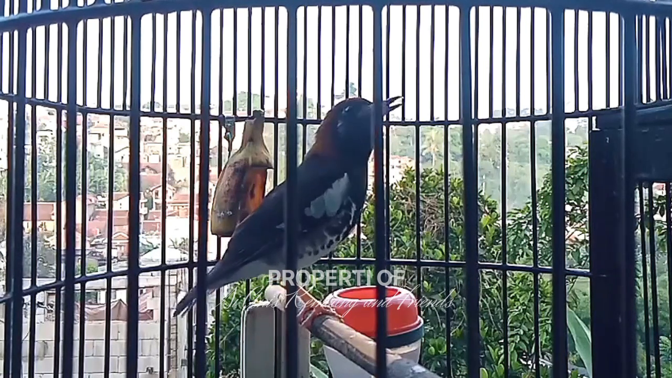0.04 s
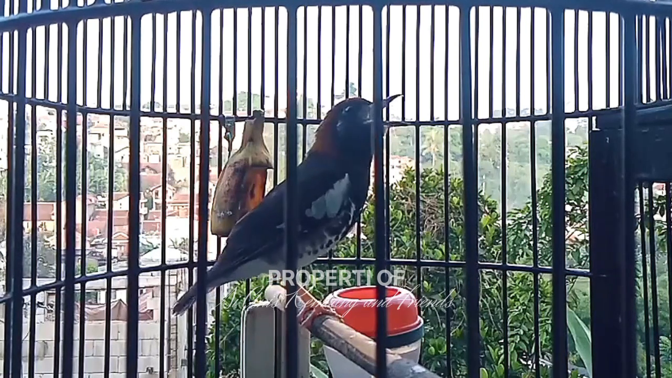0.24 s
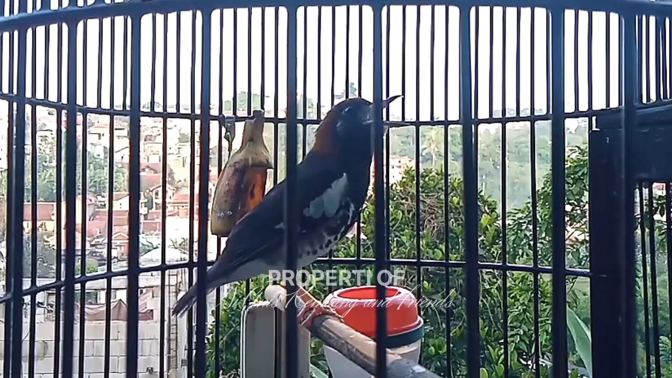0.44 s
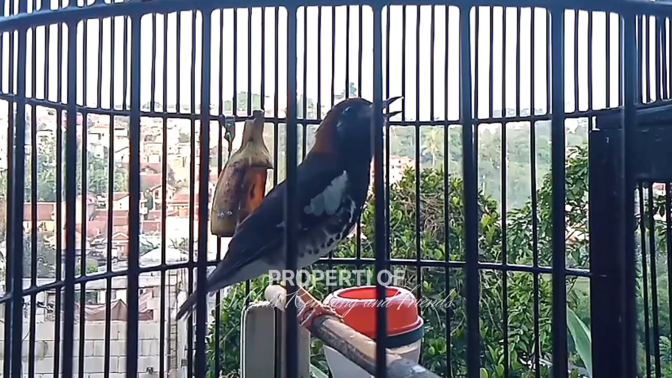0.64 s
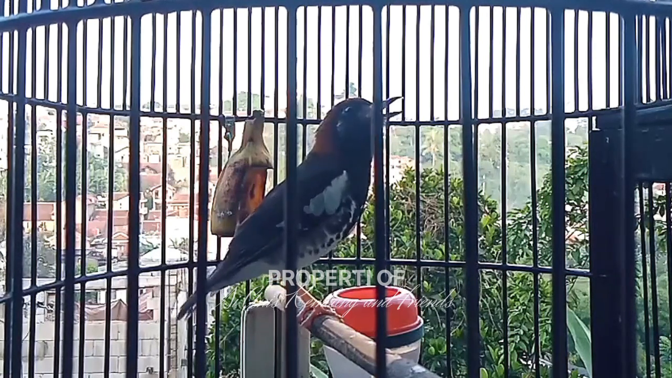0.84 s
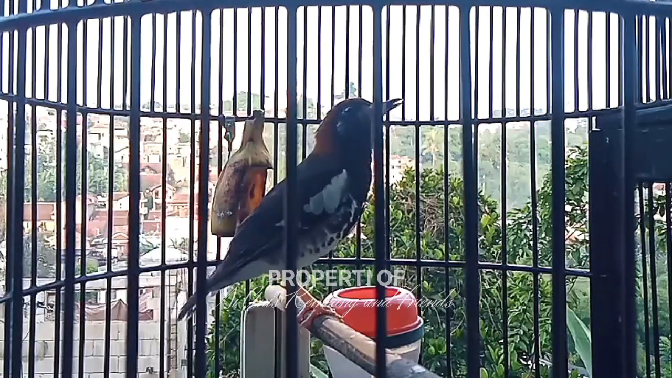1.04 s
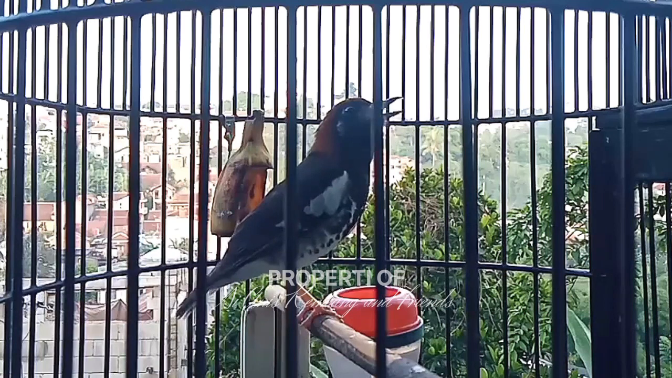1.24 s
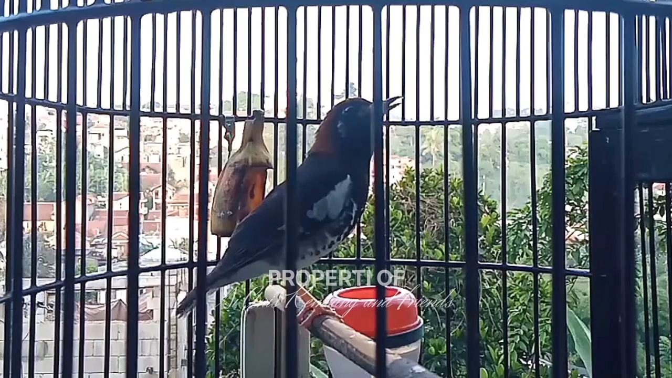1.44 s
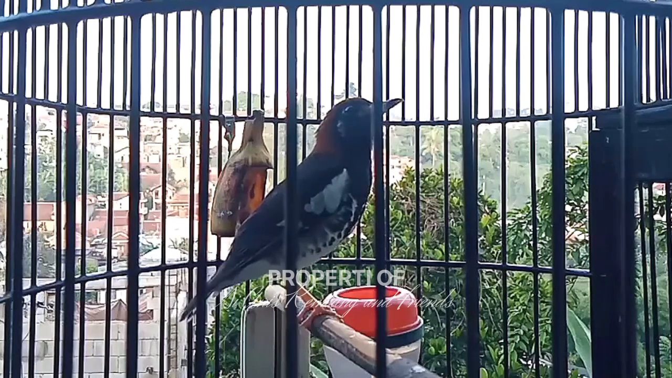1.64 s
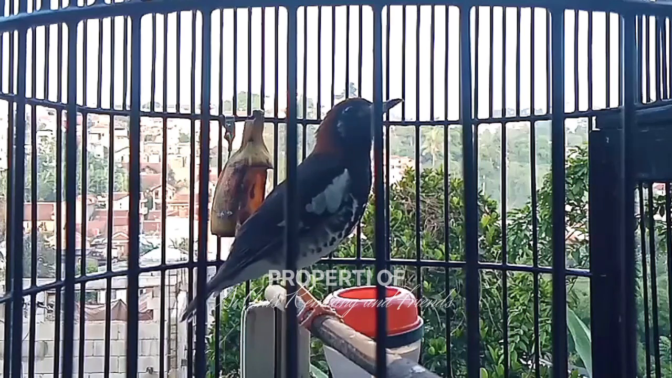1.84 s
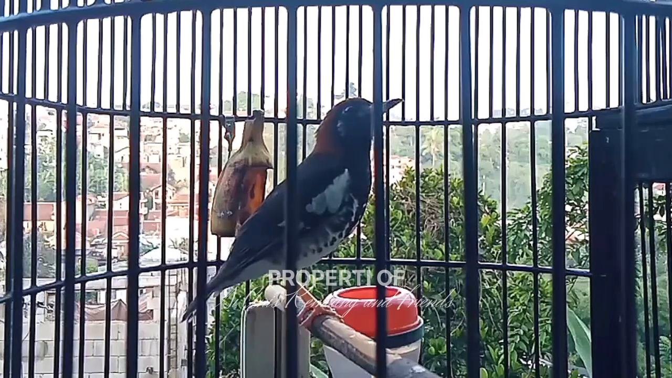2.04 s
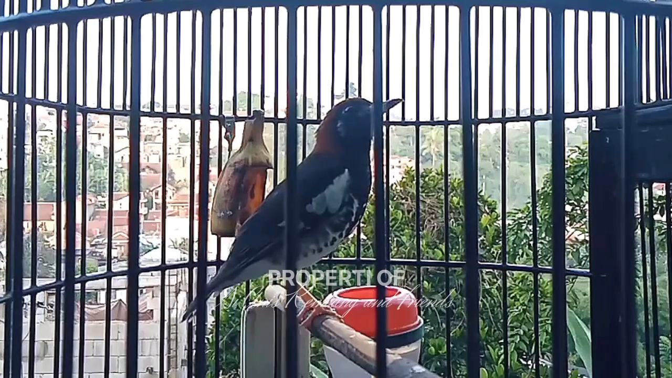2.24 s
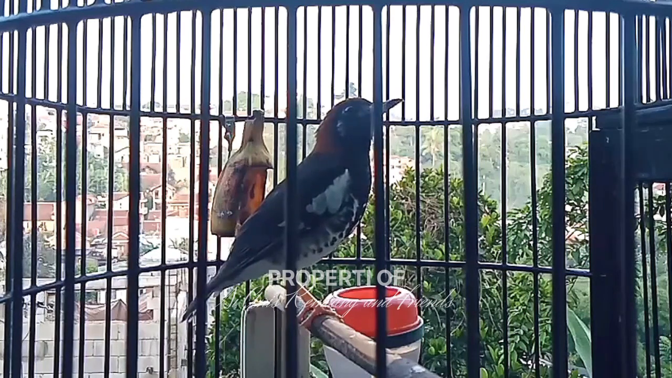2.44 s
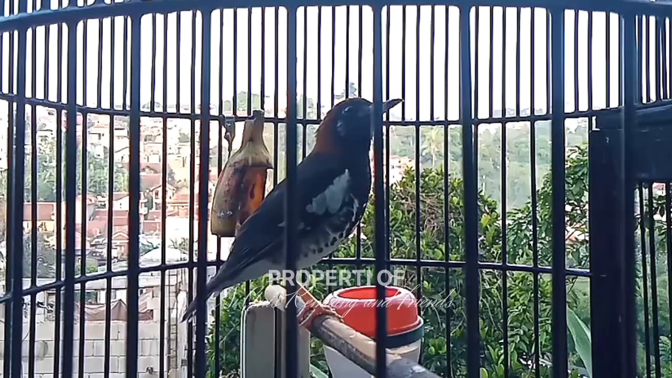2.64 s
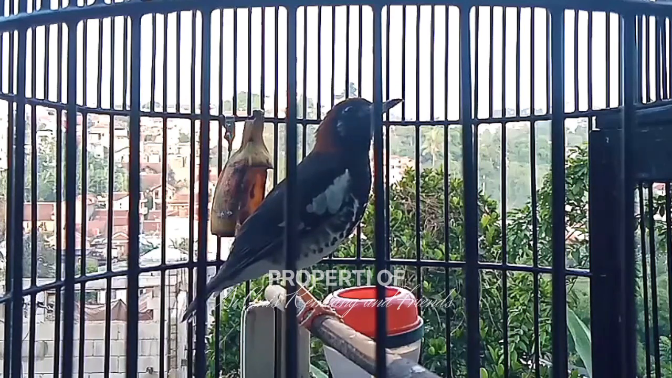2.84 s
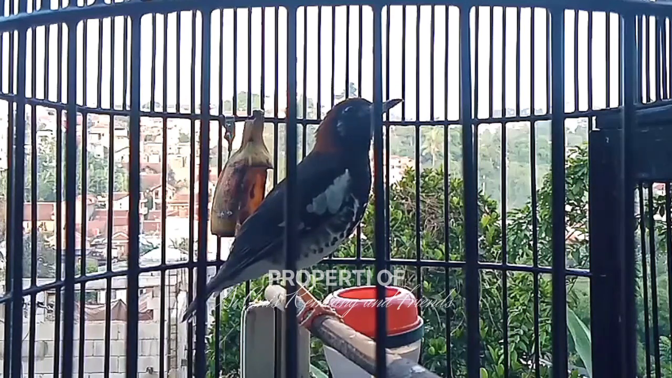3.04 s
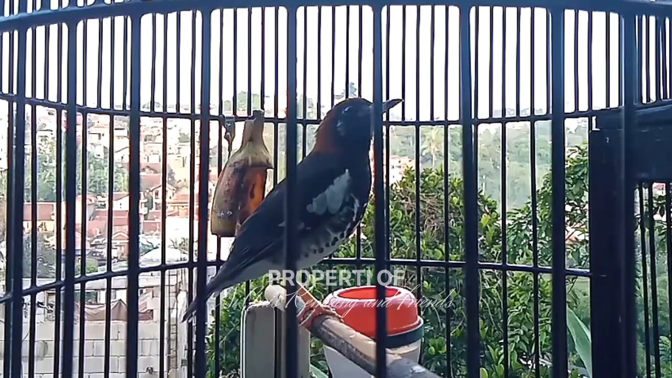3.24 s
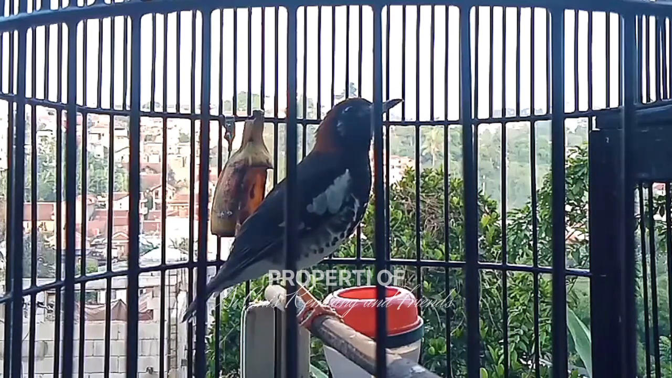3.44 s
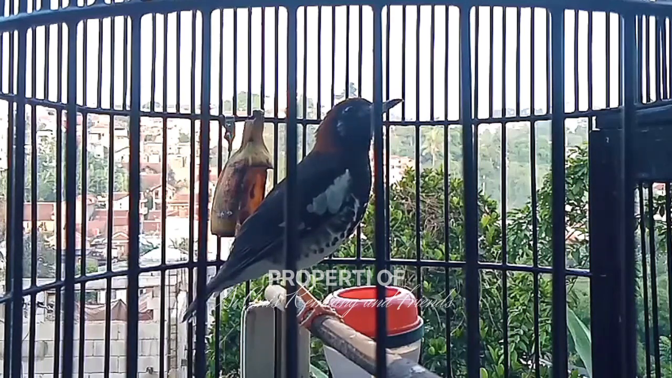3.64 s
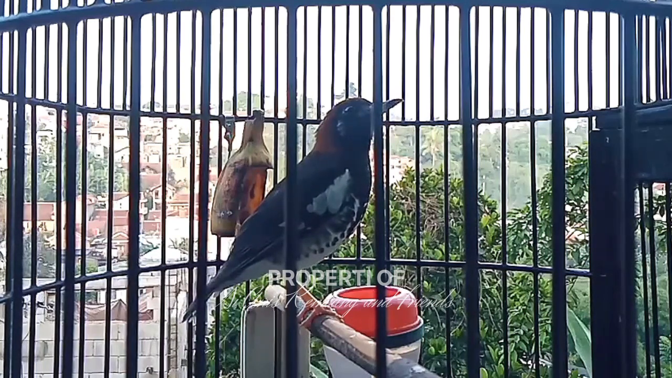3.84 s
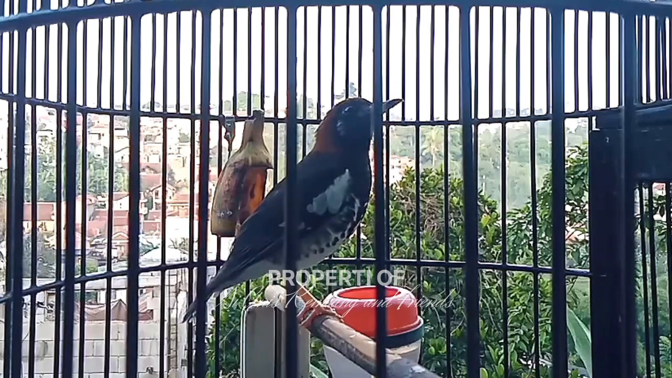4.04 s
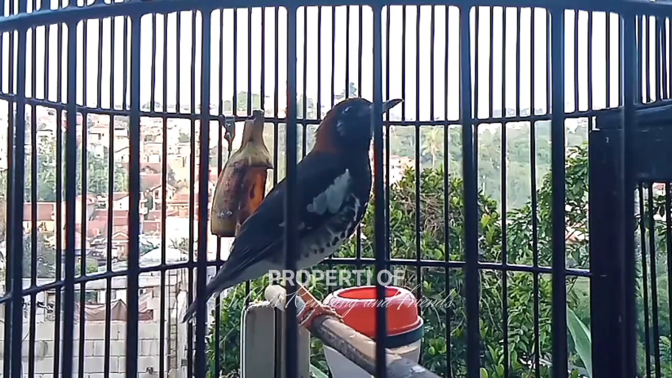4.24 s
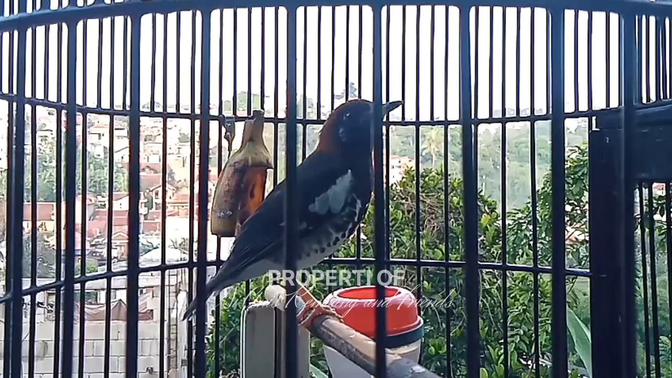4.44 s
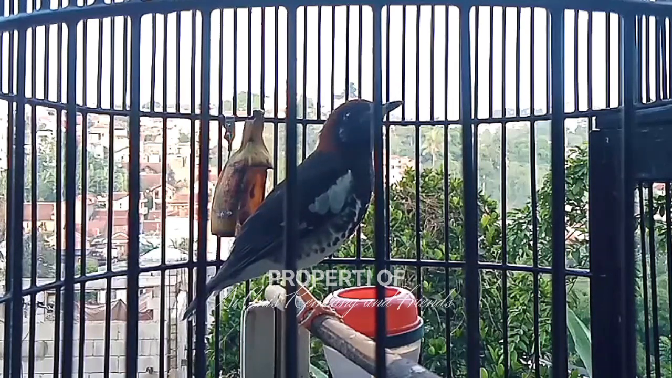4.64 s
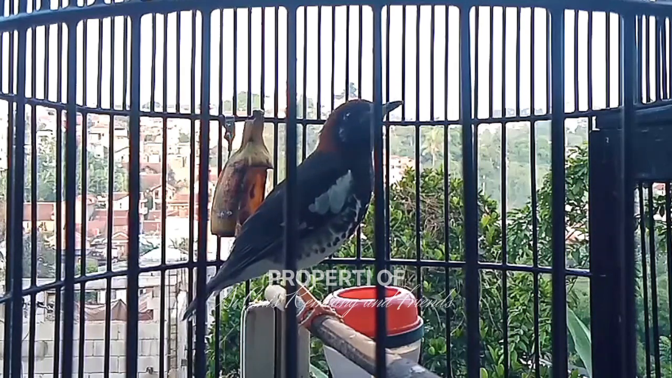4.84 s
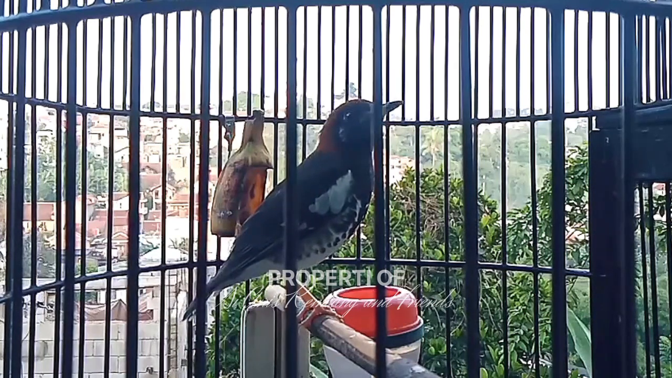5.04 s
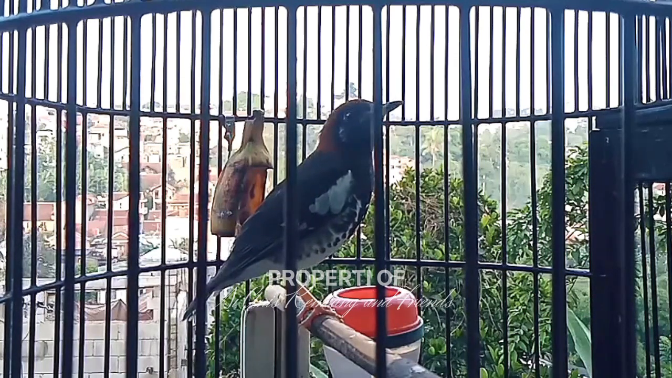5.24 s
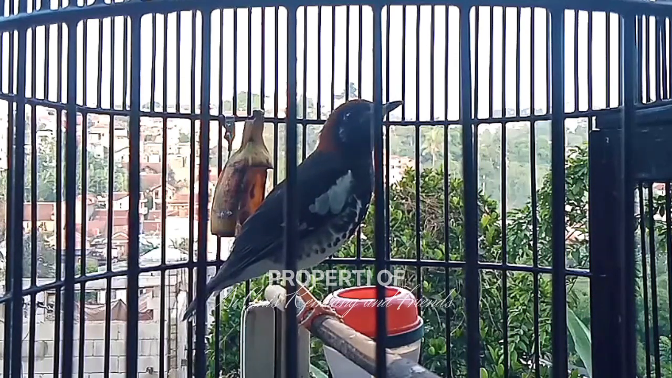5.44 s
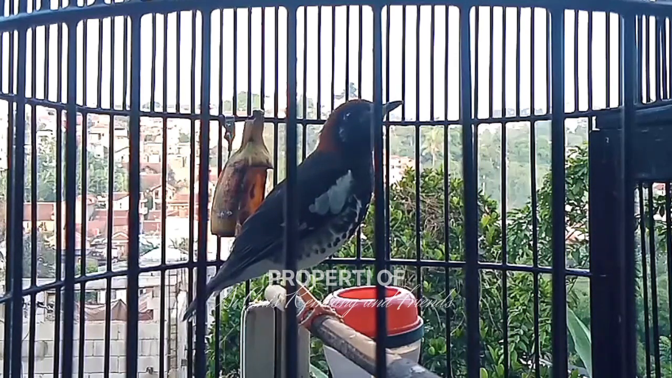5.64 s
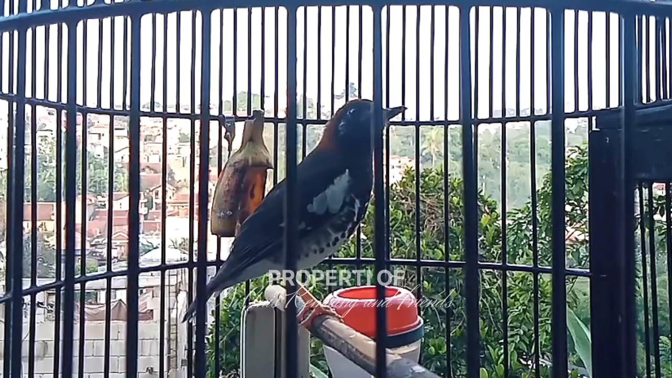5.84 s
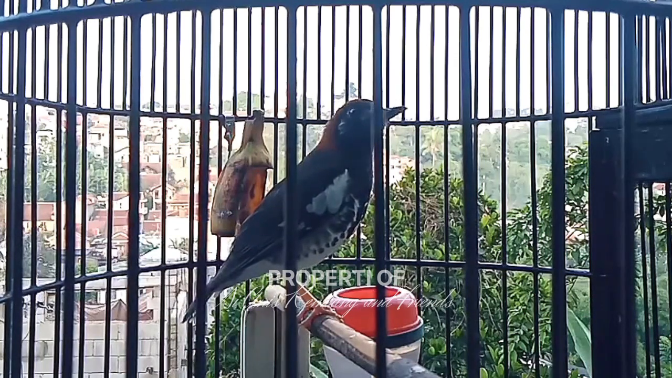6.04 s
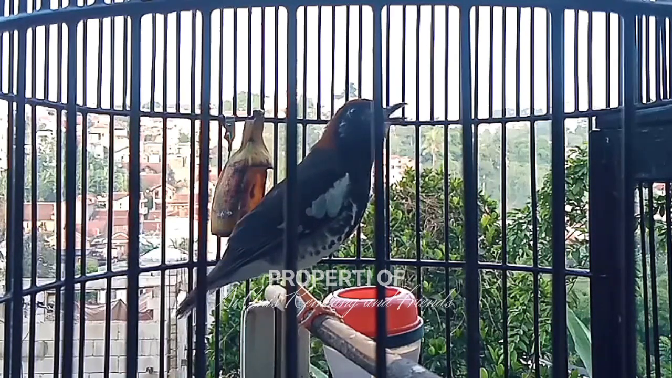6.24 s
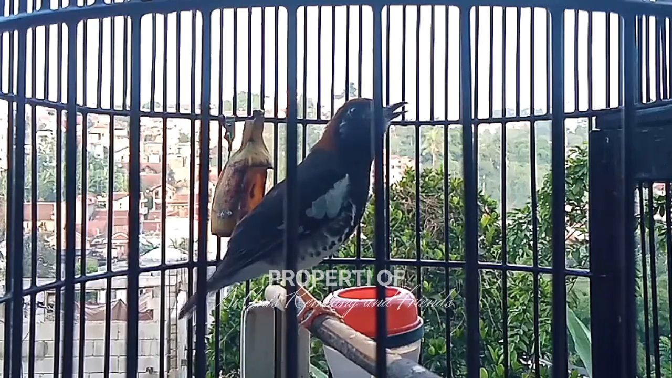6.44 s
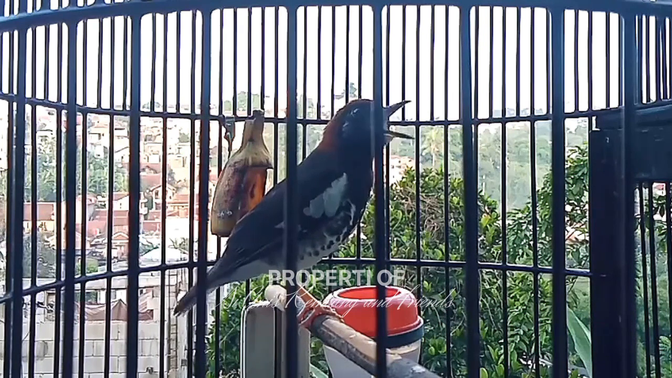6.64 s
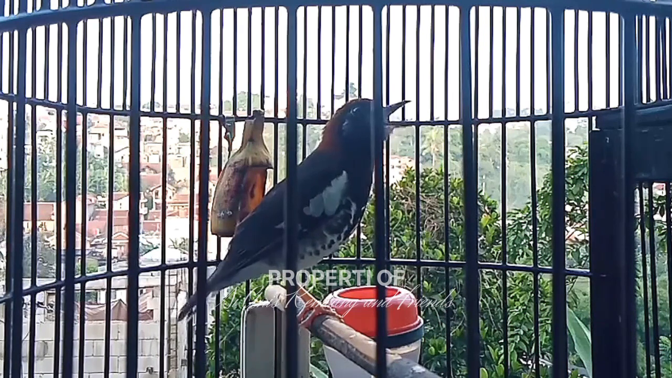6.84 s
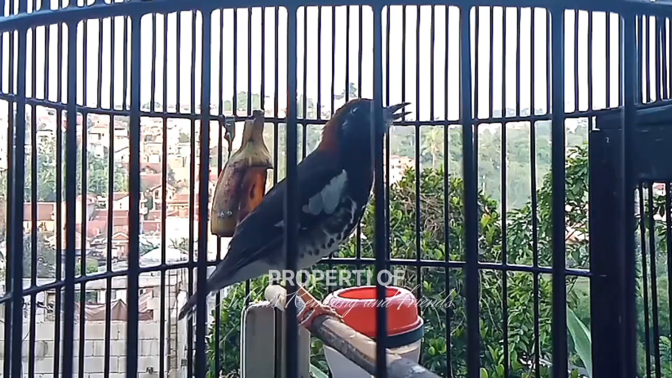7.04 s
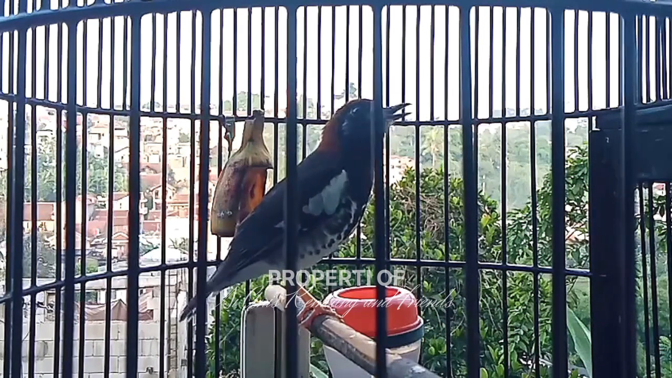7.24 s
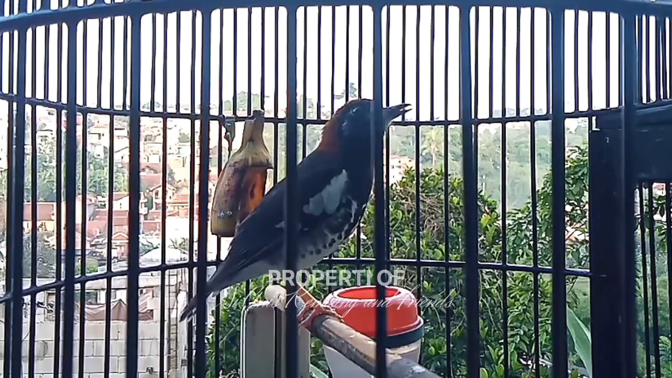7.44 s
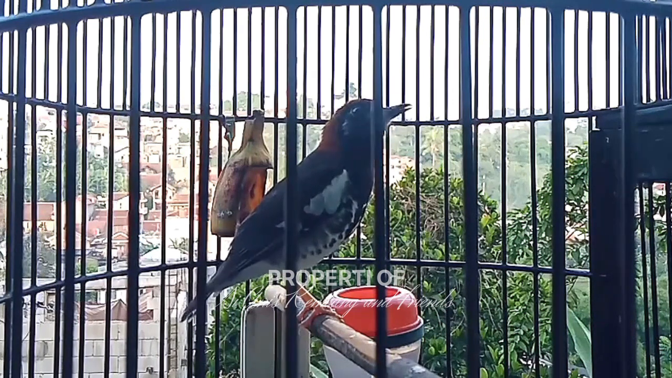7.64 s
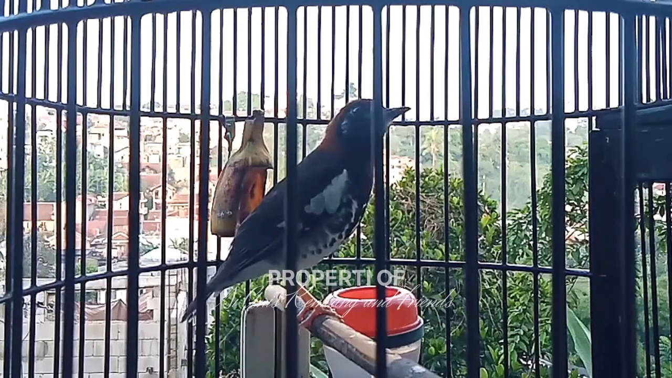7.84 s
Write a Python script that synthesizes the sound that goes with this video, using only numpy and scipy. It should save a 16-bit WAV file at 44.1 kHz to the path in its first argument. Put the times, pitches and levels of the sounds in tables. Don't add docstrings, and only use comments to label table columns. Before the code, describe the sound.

Very close, a caged thrush sings a falling whistle, a high two-toned note, three short held notes and a plunging, then falling whistle. After about 1.7 seconds it stops. Distant roosters crow over low traffic, with faint small chirps. Near 6.3 seconds the bird returns with a falling whistle and six quick upward double chirps. Close microphone on an open porch, short wall reflections.

```python
import sys
import numpy as np
from scipy import signal
from scipy.io import wavfile
from scipy.ndimage import uniform_filter1d, minimum_filter1d

SR = 44100
rng = np.random.default_rng(int(sys.argv[2]) if len(sys.argv) > 2 else 0)


def output_pcm(signal):
    pcm = np.clip(np.atleast_2d(signal).T, -1, 1) * 32767
    wavfile.write(sys.argv[1], SR, np.round(pcm).astype(np.int16))


def voltage_ratio(level):
    return 10 ** (np.asarray(level, float) / 20)


N = 348371

# (time [s], level [dB])
TRAFFIC_LEVEL = [(0, -56.5), (.4, -57.5), (.85, -62), (1.25, -60), (1.6, -65), (1.849, -60), (3.3, -62),
                 (3.85, -63.5), (4.3, -62), (4.7, -58.5), (5.001, -52.5), (6.15, -52.5), (6.452, -60),
                 (6.93, -62.5), (7.399, -57), (7.9, -51)]
# (frequency [Hz], level per Hz [dB])
RUMBLE_COLOUR = [(15, -60.5), (25, -31), (38, -27.5), (86, -5.5), (145, 2.5), (270, -6.5), (330, -11.5),
                 (600, -24), (780, -46), (1320, -120)]
ROAR_COLOUR = [(180, -35), (300, -8.5), (548, -6), (639, -8), (763, -8), (1140, -14), (1500, -11.5),
               (2610, -16.5), (2970, -12.5), (5060, -33), (6580, -63.5), (11100, -120)]
HISS_COLOUR = [(4500, -13), (6000, -3.5), (11000, 0.5), (13000, -8.5), (15800, -12.5)]

# (time [s], pitch [Hz], level [dB], roughness [0-1])
LONG_CROWS = [
    [(0, 754, -40.5, 0.06), (.15, 754, -47.5, .1), (.3, 747.4, -52, .2), (.55, 750.5, -47.5, .2),
     (.72, 740, -62.5, .3), (.86, 724.6, -56.5, 0.23), (1.15, 675, -62, .3)],
    [(2.42, 867, -60, .15), (2.54, 905, -63, .15), (2.63, 922, -77, 0.19), (2.8, 907, -54.5, 0.16),
     (3.25, 883, -57, 0.36), (3.4, 823, -49.5, 0.07), (3.7, 817.7, -51.5, .1), (3.92, 805.6, -57, 0.21),
     (4.2, 733, -54.5, 0.47)],
]
# (start [s], length [s], pitch [Hz], peak level [dB], roughness [0-1])
CROW_SYLLABLES = [
    (3.93, .18, 560, -57, .6),
    (4.28, .19, 746, -46, .08),
    (4.55, .36, 708, -51, .2),
    (4.53, .3, 572, -57, .15),
    (5.16, .26, 530, -46, .06),
    (5.95, 1.2, 688, -55, .2),
    (6.17, .3, 565, -51, .2),
    (4.25, .07, 570, -57, .2),
    (4.85, .38, 682, -58, .1),
]
# (share of length [0-1], pitch change [share], level [dB])
SYLLABLE_OUTLINE = [(0, -.02, -11), (.15, 0, -2), (.7, -.003, 0), (1, -.025, -12)]
# (harmonics 1, 2, 3, 4, 5 [dB])
CROW_HARMONICS = [(-4.5, 3.5, -26, -31.5, -32.5), (-8.5, 0, -28, -35.5, -33), (4.5, 1, -2, -5, -11),
                  (5.5, -1, -5, -13, -32), (6, 6, -8, -6, -37.5), (7.5, -1, -9.5, -13, -27),
                  (7, -7, -10, -20, -29.5), (-14.5, -5, -22.5, -23, -26), (3.5, -20.5, -22.5, -11, -25.5),
                  (8.5, 6, 4.5, -8, -4), (1, 3.5, -14, -12, -30)]
# (start [s], length [s], pitch [Hz], level [dB])
SMALL_BIRD_CHIRPS = [(2.051, 0.13, 2980, -62.5), (2.28, .16, 3140, -56), (3.43, 0.055, 3600, -65),
                     (2.866, 0.041, 3000, -57), (3.073, 0.075, 2826, -61), (3.571, 0.045, 3690, -62.5),
                     (4.247, 0.076, 4160, -60.5), (5.07, 0.15, 3146, -51.5), (5.378, 0.062, 3455, -53),
                     (2.15, .1, 2964, -62), (2.463, .1, 3346, -68), (3.26, .06, 2950, -67),
                     (5.66, 0.088, 3030, -60.5), (5.86, 0.056, 2940, -60)]
# (delay [s], level [dB])
WALL_ECHOES = [
    (.0072, -13),
    (.017, -13),
    (.03, -23),
    (0.085, -34),
]

# (time [s], pitch [Hz], level [dB])
OPENING_WHISTLE = [(-.002, 2166, -18), (.025, 2168, -4), (.045, 2145, -4), (.065, 2119, -4),
                   (.082, 2105, -9), (.115, 2048, -10.5), (.155, 1917, -14), (.175, 1718, -19),
                   (.19, 1480, -31.5)]
CLOSING_WHISTLE = [(1.396, 2507, -19.5), (1.411, 2467, -17), (1.435, 2400, -9), (1.468, 2337, -15),
                   (1.562, 2310, -14), (1.591, 2271, -15.5), (1.615, 2152, -12.5), (1.64, 1814, -20.5),
                   (1.675, 1278, -36)]
RETURN_WHISTLE = [(6.303, 3350, -20.5), (6.31, 3224, -7.5), (6.33, 3188, -7.5), (6.365, 2703, -10.5),
                  (6.42, 2375, -13), (6.48, 2180, -13), (6.52, 2139, -10.5), (6.57, 2027, -13.5),
                  (6.585, 1938, -27)]
PLUNGING_WHISTLE = [(1.086, 5028, -29), (1.095, 4676, -18.5), (1.11, 4393, -23.5), (1.122, 4124, -21.5),
                    (1.135, 4044, -29), (1.145, 3357, -18)]
# (time [s], pitch [Hz], level [dB])
UPPER_WHISTLE = [(0.3, 3486, -13), (.306, 3820, -8.5), (.318, 3770, -11.5), (.33, 3677, -8),
                 (.345, 3768, -11.5), (.37, 3670, -22), (.4, 3580, -18.5), (.414, 3447, -19.5),
                 (.428, 3433, -32.5)]
LOWER_WHISTLE = [(.315, 2866, -24), (.322, 2910, -24.5), (.343, 2887, -12.5), (.375, 2874, -9.5),
                 (.4, 2893, -9), (0.437, 2872, -10), (0.446, 2795, -11), (0.454, 2785, -17),
                 (0.466, 2990, -23.5)]
# opening, upper, lower, closing, return, plunge (level [dB])
WHISTLE_SECONDS = [-47.5, -35.5, -41, -42.5, -58, -22]
# (start [s], length [s], pitch [Hz], peak level [dB], pitch scoop at the start [Hz])
HELD_NOTES = [
    (.556, .072, 3473, -1, 110),
    (0.686, 0.11, 2739, -4, -250),
    (0.907, .092, 2680, -2.5, -150),
]
EFFORT_POINTS = [0, .09, .33, .6, .87, 1]
HELD_EFFORT = [(-20.5, -5, -5, 0, -5.5, -16), (-22, -8.5, -4, 2, -4, -13), (-21, -8, 0, -4, -5.5, -11)]
# (start [s], length [s], top pitch [Hz], peak [dB], rise time [s])
ROUNDED_FLICKS = [
    (6.713, .044, 3317, -1, .0035),
    (6.866, 0.036, 3323, -1.5, 0.0025),
    (7.043, 0.035, 3401, -2.5, .0035),
]
LATER_FLICKS = [
    (7.266, 0.031, 3355, -0.5, 0.0057),
    (7.458, .033, 3385, -0.5, 0.0052),
    (7.643, 0.034, 3660, 1, 0.0064),
]
# (share of length [0-1], level relative to the peak [dB])
ROUNDED_FLICK_OUTLINE = [(0, -30.5), (.14, -8.5), (.35, -3.5), (.55, 2), (.8, -11), (0.999, -4.5)]
LATER_FLICK_OUTLINE = [(0, -17.5), (0.122, -16.5), (.35, -7), (.55, -6.5), (.8, -14), (1, -4.5)]
# (start [s], length [s], start pitch [Hz], end pitch [Hz], peak level [dB])
FIRST_ANSWERS = [
    (6.745, .061, 4600, 4130, -15),
    (6.893, .068, 4642, 4070, -16.5),
    (7.069, .06, 4753, 4233, -15),
]
LATER_ANSWERS = [
    (7.28, .075, 5260, 4950, -29),
    (7.495, .048, 5350, 5120, -26.5),
    (7.677, .047, 5360, 5155, -26),
]
# (share of length [0-1], level relative to the peak [dB])
FIRST_ANSWER_OUTLINE = [(0, -29), (.15, -10.5), (.4, -7), (.68, 0.5), (.85, -5.5), (1, 2)]
LATER_ANSWER_OUTLINE = [(0, -15), (.3, -9.5), (.6, -3), (.8, -0.5), (1, -18.5)]
# (multiple of the pitch, level relative to its second harmonic [dB])
THRUSH_OVERTONES = [(2, 5.5), (3, -7), (4, -29.5), (5, -13.5)]
# (times upper pitch, times lower pitch, level [dB])
MIXED_TONES = [
    (2, -1, -34),
    (-1, 2, -41),
    (1, 1, -47),
    (3, -2, -56),
]
# (start [s], length [s], first centre [Hz], last centre [Hz], level [dB])
RASP_BURST = (1.121, .024, 4000, 3500, -27)
# (time [s], level [dB])
DULL_CLICKS = [
    (.558, -19),
    (.572, -15),
    (.909, -28),
    (1.093, -34),
    (1.398, -28),
]
# (lowest, highest [Hz])
CLICK_RANGE = [3300, 6200]
# (time [s], level [dB])
GAIN_STEPS = [
    (.3034, -27.5),
    (.3064, -29.5),
    (6.32, -48.5),
    (6.7295, -34.5),
    (7.467, -50),
    (7.6612, -5),
]


def in_time(rows, fade=.0025):
    s, *columns = np.transpose(rows)
    at = np.arange(max(int(s[0] * SR), 0), min(int(s[-1] * SR), N))
    since_start = at / SR - s[0]
    until_end = s[-1] - at / SR
    ramp = np.clip(np.minimum(since_start, until_end / 2) / fade, 0, 1)
    return at, np.sin(np.pi / 2 * ramp) ** 2, [np.interp(at / SR, s, c) for c in columns]


def rms_one(x):
    return x / np.sqrt(np.mean(x ** 2) + 1e-20)


def lowpass_or_band(x, order, hz, kind):
    return signal.sosfilt(signal.butter(order, hz, kind, fs=SR, output="sos"), x)


def drift(rate_hz, size=N):
    r = np.exp(-2 * np.pi * rate_hz / SR)
    wander = signal.lfilter([1], [1, -2 * r, r * r], rng.standard_normal(size + SR))
    return rms_one(wander[SR:])


def banded_noise(spectrum, patchy_db):
    hz, level_db = np.transpose(spectrum)
    bands = int(3 * np.log2(hz[-1] / hz[0])) + 1
    edges = np.geomspace(hz[0], min(hz[-1], 19000), bands + 1)
    white, together, flicker, out = rng.standard_normal((2, N)), drift(5), drift(9), 0
    for k, (low, high) in enumerate(zip(edges, edges[1:])):
        band = lowpass_or_band(white[k % 2], 2, [low, high], "band")
        centre_db = np.interp(np.log(low * high) / 2, np.log(hz), level_db)
        alone = np.roll(flicker, 9973 * (k + 1))
        out = out + band * voltage_ratio(centre_db + patchy_db * (0.3 * together + alone))
    return rms_one(out)


def hiss():
    return voltage_ratio(-90.5) * banded_noise(HISS_COLOUR, patchy_db=-0.4)


def town_traffic():
    near_db = np.interp(np.arange(N) / SR, *np.transpose(TRAFFIC_LEVEL))
    rumble = voltage_ratio(near_db + 4.5) * banded_noise(RUMBLE_COLOUR, patchy_db=2.0)
    roar_db = near_db + 0.5 + (1.4 - 1) * (near_db - near_db.mean())
    roar = voltage_ratio(roar_db) * banded_noise(ROAR_COLOUR, patchy_db=0.6)
    top = lowpass_or_band(roar, 2, 3000, "high")
    roar = roar + top * (voltage_ratio(0.5 * (near_db - near_db.max())) - 1)
    return lowpass_or_band(rumble + roar, 4, [50, 4400], "band")


def noise_reduction(x, contrast=0.19):
    cells = signal.stft(x, nperseg=1024)[2]
    power = uniform_filter1d(np.abs(cells) ** 2, size=3, axis=0)
    usual = uniform_filter1d(uniform_filter1d(power, size=9, axis=0), size=31, axis=1) + 1e-30
    gain = np.clip(power / usual, 0, 2) ** contrast
    return signal.istft(cells * gain, nperseg=1024)[1][:N]


def roosters():
    out, shake, tremble, air = np.zeros(N), drift(50), drift(120), drift(14)
    short = [[(s + share * length, hz * (1 + bend), db + rel_db, rough)
              for share, bend, rel_db in SYLLABLE_OUTLINE]
             for s, length, hz, db, rough in CROW_SYLLABLES]
    for rows, tone in zip(LONG_CROWS + short, CROW_HARMONICS):
        at, edge, (hz, level_db, rough) = in_time(rows, fade=0.02)
        phase = 2 * np.pi * np.cumsum(hz * (1 + 0.04 * rough * shake[at])) / SR
        stack = 0
        for k, rel_db in enumerate(tone):
            fading_db = 2.4 * np.roll(air, 7919 * k)[at]
            stack = stack + voltage_ratio(rel_db + fading_db) * np.sin((k + 1) * phase)
        out[at] += voltage_ratio(level_db) * edge * stack * (1 - .6 * rough + 1.6 * rough * tremble[at])
    return out


def small_birds():
    out, warble = np.zeros(N), drift(90)
    for s, length, hz, level_db in SMALL_BIRD_CHIRPS:
        at = np.arange(int(s * SR), int((s + length) * SR))
        phase = 2 * np.pi * np.cumsum(hz * (1 + 0.031 * warble[at])) / SR
        out[at] += voltage_ratio(level_db) * np.hanning(len(at)) * np.sin(phase)
    return out


def fading_tail(noise, level_db, t60_s):
    t = np.arange(SR) / SR
    return voltage_ratio(level_db) * noise * voltage_ratio(-60 * t / t60_s) / np.sqrt(t60_s * SR / np.log(1e6))


def porch(x):
    noise = rng.standard_normal((2, SR))
    near = fading_tail(noise[0], -12.5, .25)
    far = fading_tail(noise[1], -35, .55)
    reply = (near + far) * np.clip(np.arange(SR) / SR / 0.02, 0, 1)
    for delay, echo_db in WALL_ECHOES:
        width = int(2.5 * delay ** 2 * SR) + 1
        scatter = noise[1, -width:]
        reply[int(delay * SR):][:width] += voltage_ratio(echo_db) * scatter / np.sqrt(np.sum(scatter ** 2))
    reply = lowpass_or_band(reply, 1, 7000, "low")
    return x + signal.fftconvolve(x, reply)[:N]


def ducking(loud):
    from_db, slope, release_db_per_s = -26, 0.51, 150
    level_db = 10 * np.log10(np.abs(uniform_filter1d(loud ** 2, size=441)) + 1e-12)
    ramp = release_db_per_s * np.arange(N) / SR
    held_db = np.maximum.accumulate(level_db + ramp) - ramp
    return voltage_ratio(-slope * uniform_filter1d(np.maximum(held_db - from_db, 0), size=441))


def dull_clicks():
    out = np.zeros(N)
    s, level_db = np.transpose(DULL_CLICKS)
    out[(s * SR).astype(int)] = voltage_ratio(level_db)
    return lowpass_or_band(out + 1e-18, 3, CLICK_RANGE, "band")


def rasp():
    out = np.zeros(N)
    s, length, from_hz, to_hz, level_db = RASP_BURST
    at, edge, (hz,) = in_time([(s, from_hz), (s + length, to_hz)], fade=0.0045)
    wobble = drift(850)[at]
    phase = 2 * np.pi * np.cumsum(hz) / SR
    out[at] = voltage_ratio(level_db) * edge * wobble * (np.sin(phase) + voltage_ratio(-23.5) * np.sin(2 * phase))
    return out


def breath(song):
    loudness = np.sqrt(np.abs(uniform_filter1d(song ** 2, size=220)))
    air = lowpass_or_band(rng.standard_normal(N), 4, [3050, 4300], "band")
    return voltage_ratio(-53) * loudness * rms_one(air)


def shaped(s, length, pitch, peak_db, shape):
    share = np.linspace(0, 1, num=25)
    level_db = peak_db + np.interp(share, *np.transpose(shape))
    return np.transpose([s + share * length, pitch(share * length), level_db])


def held_notes():
    notes = []
    for (s, length, hz, db, scoop_hz), effort_db in zip(HELD_NOTES, HELD_EFFORT):
        def pitch(age):
            return hz + scoop_hz * np.exp(-age / 0.019) - 200 * (age / length) ** 12
        notes.append((shaped(s, length, pitch, db, list(zip(EFFORT_POINTS, effort_db))), -50.5))
    return notes


def flicks(rows, rounded, shape):
    notes, from_hz = [], 2050
    for s, length, top_hz, db, rise in rows:
        def pitch(age):
            share = age / length
            sag_hz = 120 * (1 - share) + 330 * share ** 6
            return top_hz - (top_hz - from_hz) * np.exp(-age / rise) - rounded * sag_hz
        notes.append((shaped(s, length, pitch, db, shape), -47))
    return notes


def answers(rows, bend, shape, second_db):
    notes = []
    for s, length, from_hz, to_hz, db in rows:
        def pitch(age):
            share = age / length
            return from_hz + (to_hz - from_hz) * share * (1 + bend * (1 - share))
        notes.append((shaped(s, length, pitch, db, shape), second_db))
    return notes


def song_notes():
    whistles = [OPENING_WHISTLE, UPPER_WHISTLE, LOWER_WHISTLE, CLOSING_WHISTLE, RETURN_WHISTLE, PLUNGING_WHISTLE]
    notes = list(zip(whistles, WHISTLE_SECONDS)) + held_notes()
    notes += flicks(ROUNDED_FLICKS, 1, ROUNDED_FLICK_OUTLINE)
    notes += flicks(LATER_FLICKS, 0, LATER_FLICK_OUTLINE)
    notes += answers(FIRST_ANSWERS, 0.48, FIRST_ANSWER_OUTLINE, -32)
    return notes + answers(LATER_ANSWERS, 0.24, LATER_ANSWER_OUTLINE, -20)


def mixed_tones(upper, lower, blur):
    out = np.zeros(N)
    (up_at, up, up_edge), (low_at, low, low_edge) = upper, lower
    both, i, j = np.intersect1d(up_at, low_at, return_indices=True)
    fading = voltage_ratio(-np.linspace(0, 6, len(both)))
    swell = up_edge[i] * low_edge[j] * fading * (1 + .5 * blur[both])
    for m, n, mix_db in MIXED_TONES:
        out[both] += voltage_ratio(mix_db) * swell * np.sin(m * up[i] + n * low[j])
    return out


def thrush():
    clear_hz = 7740
    out, phases = np.zeros(N), []
    flutter, blur = voltage_ratio(.25 * drift(35)), drift(320)
    grain = rms_one(lowpass_or_band(rng.standard_normal(N), 4, 1100, "low"))
    for note, mean_second_db in song_notes():
        at, edge, (hz, level_db) = in_time(note)
        level_db = uniform_filter1d(level_db, size=88, mode="nearest")
        octaves = np.log2(hz / 2519)
        rich_db = -23.5 * octaves - 0.5 * (level_db - -8.5)
        upper_rich_db = np.minimum(rich_db, 0.66 * rich_db)
        phase = 2 * np.pi * np.cumsum(uniform_filter1d(hz, size=130, mode="nearest")) / SR
        tone = np.sin(phase) * (1 + voltage_ratio(-54 + 10 * octaves) * grain[at])
        for k, rel_db in THRUSH_OVERTONES:
            airy = np.clip((k * hz - clear_hz) / 600, 0, 1) * (k * hz < 12500)
            clear = np.clip((clear_hz + 600 - k * hz) / 600, 0, 1)
            strength = voltage_ratio(mean_second_db + rel_db + (rich_db if k < 3 else upper_rich_db))
            tone += strength * np.sin(k * phase) * (clear + voltage_ratio(-4) * airy * blur[at])
        out[at] += np.sqrt(2) * voltage_ratio(level_db) * edge * tone * flutter[at]
        phases.append((at, phase, edge))
    return out + mixed_tones(phases[1], phases[2], blur)


def scene():
    town = town_traffic()
    behind = noise_reduction(town) + porch(roosters() + small_birds())
    song = thrush()
    bird = porch(song + breath(song) + rasp() + dull_clicks())
    return (bird + behind * ducking(bird) + hiss())[None]


def ticks():
    out = np.zeros(N)
    s, level_db = np.transpose(GAIN_STEPS)
    out[(s * SR).astype(int)] = voltage_ratio(level_db)
    return signal.lfilter([1, 0, -1], [1, -.95, .25], out)


def top_cut(x):
    return signal.sosfilt(signal.butter(12, 15900, fs=SR, output="sos"), x)


def record(dry):
    crest = -minimum_filter1d(-np.abs(dry), size=441)
    held = dry * uniform_filter1d(np.minimum(1, .9 / (crest + 1e-9)), size=221)
    mix = held + ticks()
    return top_cut(mix)


dry = scene()
out = record(dry)
output_pcm(out)
```